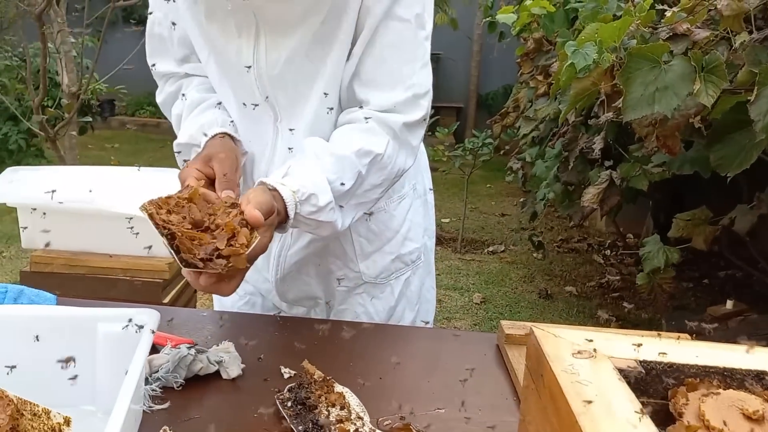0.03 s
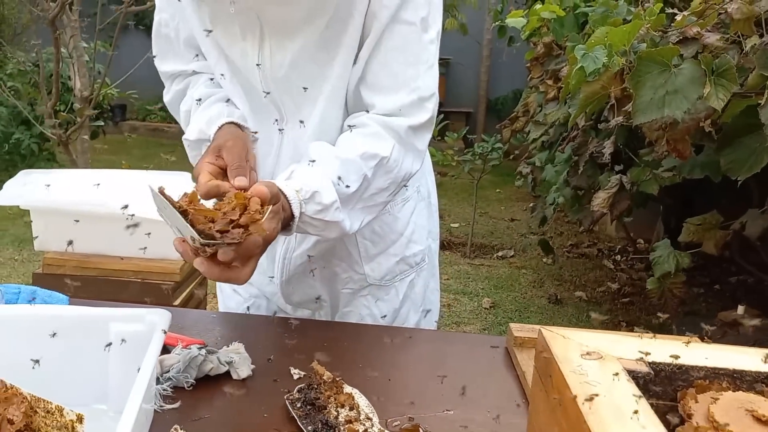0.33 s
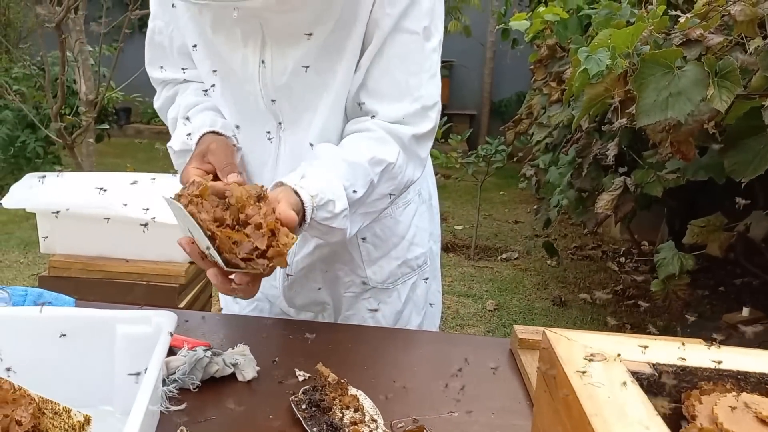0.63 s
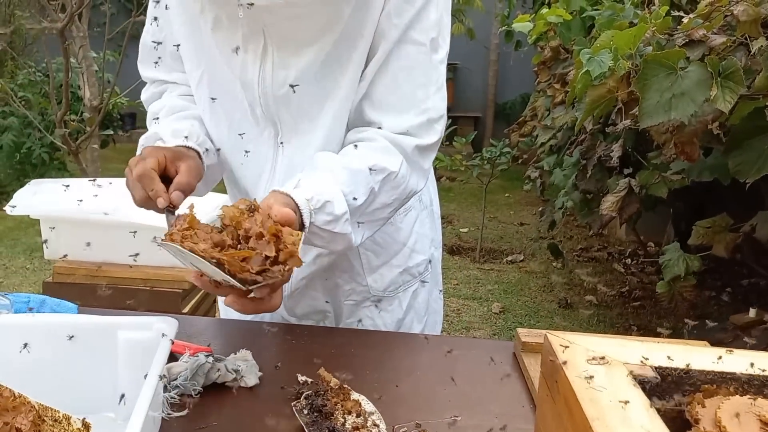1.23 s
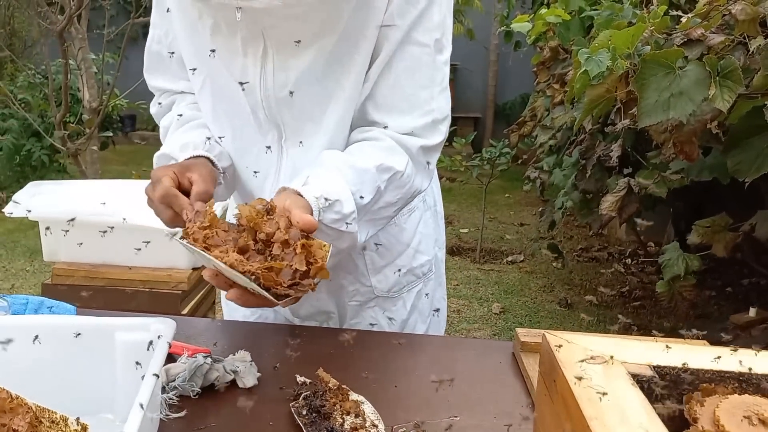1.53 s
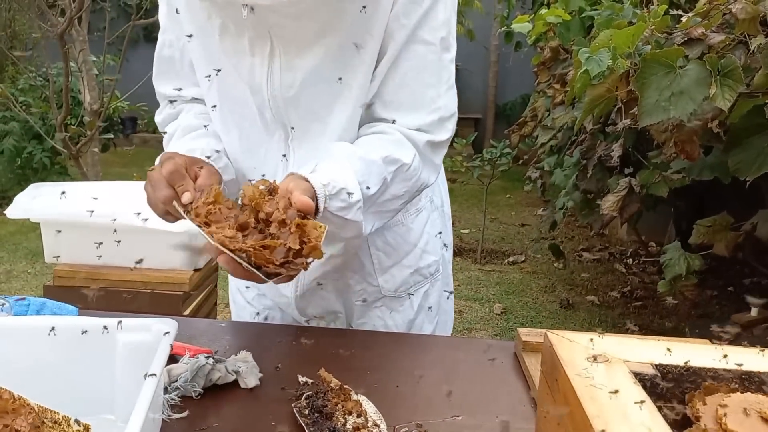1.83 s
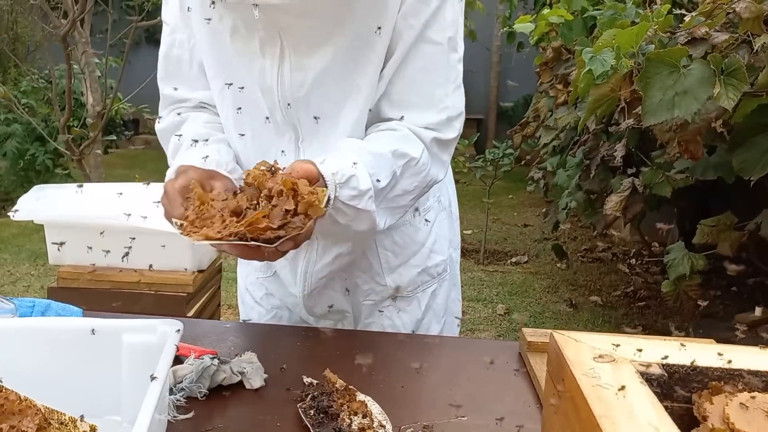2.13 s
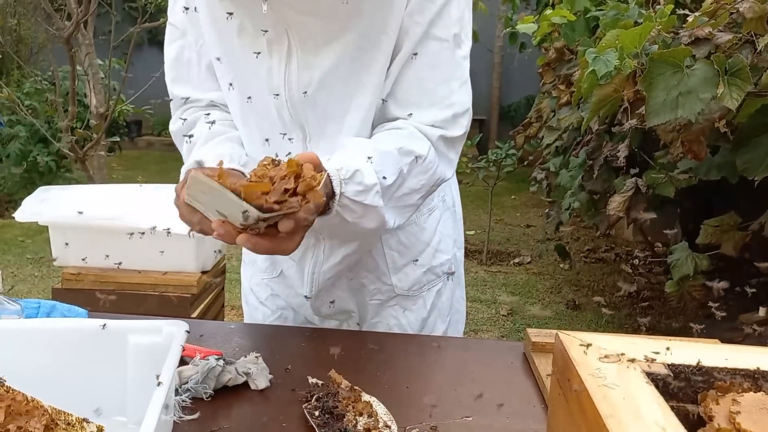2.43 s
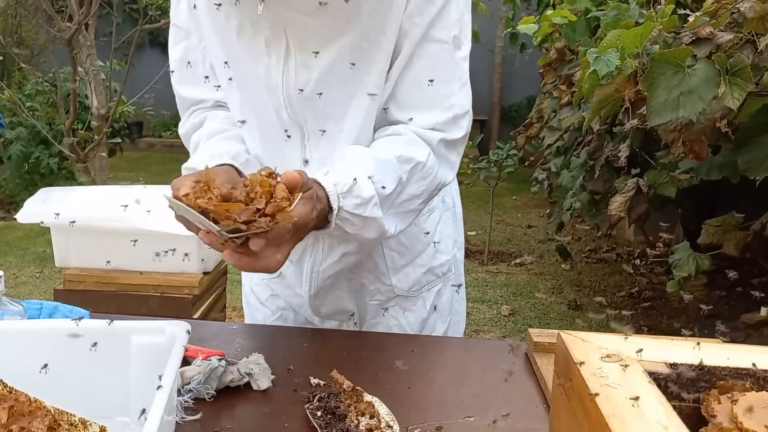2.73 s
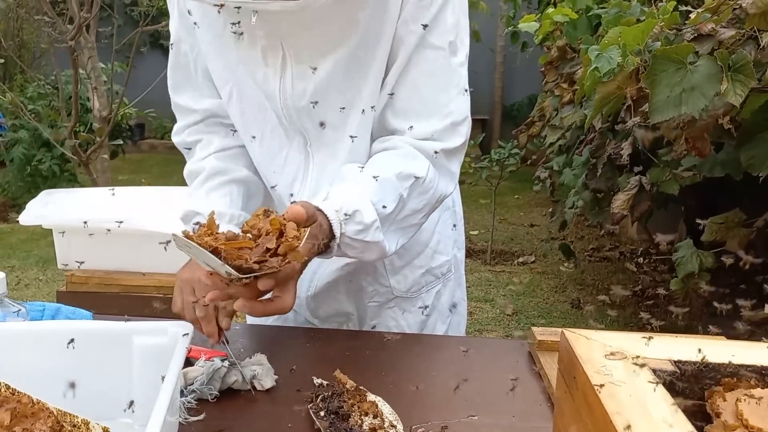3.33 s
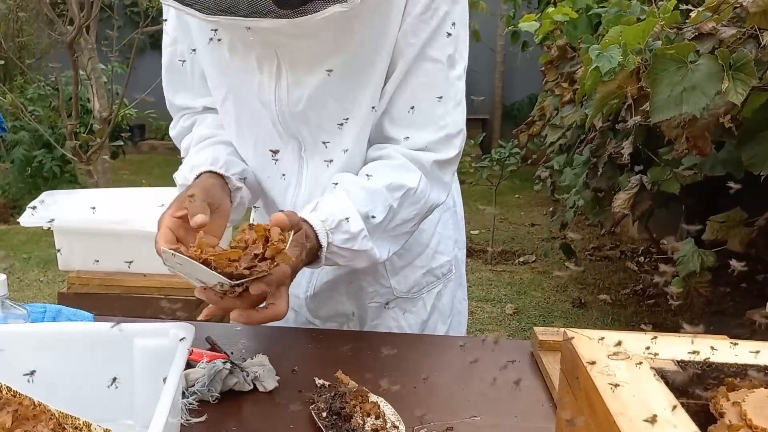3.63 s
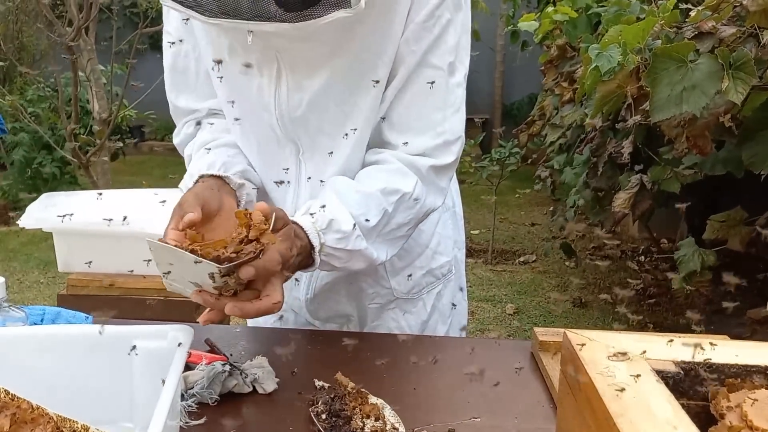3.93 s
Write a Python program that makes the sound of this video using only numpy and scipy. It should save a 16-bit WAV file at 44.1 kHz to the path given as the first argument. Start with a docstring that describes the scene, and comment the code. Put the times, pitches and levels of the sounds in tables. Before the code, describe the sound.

Wax comb crackles, creaks and snaps in irregular bursts between fingers, followed by a short scrape and two table knocks. A dull-sounding outdoor microphone also picks up soft air rumble, faint humming bees and a few far chirps.

```python
"""Brittle honeycomb is broken by hand on a flat scoop, in a garden beside open hives.
Bees hum throughout over a quiet outdoor floor; air sways on a microphone that is dull above 3 kHz.
Far birds twitter first. From 0.16 s wax cells snap, crumble and creak in bursts, loudest near 2.15 s.
Just after 3 s a hand slides along the scoop; near 3.5 s something knocks twice on the work table.
The birds return over the last ticking crumbs."""
import sys
import numpy as np
from scipy import signal
from scipy.fft import rfft, irfft
from scipy.io import wavfile

SR = 44100
rng = np.random.default_rng(int(sys.argv[2]) if len(sys.argv) > 2 else 0)


def inscribe(sig):
    """Save sig as 16-bit PCM at rate SR to the path in sys.argv[1].

    A 1-D sig is mono; a 2-D sig holds one channel per row.
    Samples are clipped to [-1, 1] before scaling.
    """
    pcm = np.round(np.clip(np.atleast_2d(sig).T, -1, 1) * 32767)
    wavfile.write(sys.argv[1], SR, pcm.astype(np.int16))


N = 176400
T = np.arange(N) / SR
LEAD_S = .02   # build-up time ahead of a break
GRAINS_PER_S = 1500


def from_db(db):
    """Decibels to gain."""
    return 10 ** (np.asarray(db) / 20)


def rms_one(x):
    """Scale to rms 1."""
    return x / np.sqrt(np.mean(x ** 2) + 1e-20)


def add(out, start_s, x):
    """Mix x in at start_s."""
    i = max(int(start_s * SR), 0)
    out[i:i + len(x)] += x[:max(N - i, 0)]


def at_hz(points, hz):
    """Read a spectrum on a log-frequency axis."""
    points_hz, points_db = np.transpose(points)
    return np.interp(np.log(hz), np.log(points_hz), points_db)


def colour(x, curve_db):
    """Minimum-phase filter with gain curve_db(hz)."""
    size = 4096
    hz = np.maximum(np.arange(size // 2 + 1) * SR / size, 1)
    cepstrum = irfft(np.log(from_db(curve_db(hz))))
    cepstrum[1:size // 2] *= 2
    cepstrum[size // 2 + 1:] = 0
    return signal.fftconvolve(x, irfft(np.exp(rfft(cepstrum))))[:len(x)]


def bandpass(x, low_hz, high_hz):
    """Butterworth band-pass."""
    return signal.sosfilt(signal.butter(2, [low_hz, high_hz], "band", fs=SR, output="sos"), x)


def resonate(x, hz, width_hz):
    """Two equal resonators in series; rms 1."""
    b, a = signal.iirpeak(hz, hz / width_hz, fs=SR)
    return rms_one(signal.lfilter(b, a, signal.lfilter(b, a, x)))


def drift(per_s, size=N):
    """Smooth random wander, spread about 1."""
    return np.interp(np.arange(size) * per_s / SR, np.arange(2000), rng.standard_normal(2000))


def grains(per_s, size):
    """Random impulses of uneven strength; rms 1."""
    impulses = (rng.random(size) < per_s / SR) * rng.choice([-1, 1], size)
    strength_db = 3 * np.minimum(rng.exponential(1, size), 4)
    return rms_one(impulses * from_db(strength_db))


def air():
    """Steady outdoor floor; slow pressure swings on the microphone."""
    # Floor spectrum. Each row: frequency in Hz, relative gain in dB.
    spectrum = [(20, -5), (40, -5.5), (160, -16.5), (500, -24), (1000, -29), (3000, -35.5), (4500, -32.5),
                (16000, -32)]
    # Pressure swing envelope. Each row: time in seconds, relative level in dB.
    swings = [(0, -30.5), (.22, -30.5), (.6, -47.5), (1.35, -47), (2.2, -39), (2.7, -34), (2.9, -45.5)]
    floor = colour(rng.standard_normal(N + SR), lambda hz: at_hz(spectrum, hz))[SR:]
    sway = bandpass(rng.standard_normal(N + SR), low_hz=4.98, high_hz=11.36)[SR:]
    sway_db = 1.5 + np.interp(T, *np.transpose(swings))
    return from_db(-22.5) * floor + from_db(sway_db) * rms_one(sway)


def bees(level_db=-69, swing_db=4, db_per_octave=-30):
    """Wingbeat tones wander in pitch and swell as bees pass."""
    out = np.zeros(N)
    for wingbeat_hz in 277.6, 290, 304:
        wander = .028 * (drift(per_s=4.6) + .37 * drift(per_s=41.57))
        phase = 2 * np.pi * np.cumsum(wingbeat_hz * (1 + wander)) / SR
        buzz = sum(from_db(db_per_octave * np.log2(k)) * np.sin(k * phase) for k in range(1, 9))
        out += from_db(level_db + swing_db * drift(per_s=2.095)) * rms_one(buzz)
    return out


def birds(sigma_s=.018):
    """Far chirps: soft pulses of a thin noise band, with a second one near 10.7 kHz."""
    # Chirps. Each row: centre in seconds, level in dB.
    chirps = [(.115, -60), (0.211, -64), (.27, -56), (3.63, -57), (3.68, -61), (3.75, -60), (3.91, -61.5)]
    envelope = sum(from_db(db) * np.exp(-.5 * ((T - at_s) / sigma_s) ** 2) for at_s, db in chirps)
    low_band = resonate(rng.standard_normal(N), hz=4420, width_hz=420)
    high_band = resonate(rng.standard_normal(N), hz=10700, width_hz=420)
    return envelope * (low_band + from_db(-1) * high_band)


def wax(x, length_s, bass_db, treble_db, flake_hz=1000, flake_db=0):
    """Fractures ring the comb, its hollow cells and one flake; rms 1 below 3 kHz over length_s."""
    # Comb body response. Each row: frequency in Hz, gain in dB.
    body = [(40, -13), (150, -18), (340, 2.5), (650, 3), (900, -4), (1300, 3.5), (2700, -4), (5000, -8.5),
            (16000, -4)]
    cells_per_octave, flake_octaves = 6.952, .22
    cells_db = 3 * rng.standard_normal(256)   # each burst has its own cells

    def curve_db(hz):
        tilt_db = np.interp(hz, [450, 900, 3000, 5000], [bass_db, 0, 0, treble_db])
        hollow_db = np.interp(cells_per_octave * np.log2(1 + hz / 400), np.arange(256), cells_db)
        ring_db = flake_db / (1 + (np.log2(hz / flake_hz) / flake_octaves) ** 2)
        return at_hz(body, hz) + tilt_db + hollow_db + ring_db

    rung = colour(x, curve_db)
    lows = signal.sosfilt(signal.butter(4, 3000, fs=SR, output="sos"), rung)
    return rung / np.sqrt(np.sum(lows ** 2) / (length_s * SR) + 1e-20)


def crack(build_ms, decay_ms, bass_db, treble_db, flake_hz=1000, flake_db=0):
    """Fractures build to one sharp break at LEAD_S and die away."""
    crackle_db, crackle_ms = -20, 6.2   # faint crackle softens each snap's start and end
    ms = np.arange(-int(LEAD_S * SR), int(.08 * SR)) * 1000 / SR
    burst = np.exp(-abs(ms) / np.where(ms < 0, build_ms, decay_ms))
    crackle = from_db(crackle_db) * np.exp(-abs(ms) / crackle_ms)
    impulses = grains(SR / 2, len(ms)) * (burst + crackle)
    impulses[ms == 0] = 9.9   # the break
    return wax(impulses, .005, bass_db, treble_db, flake_hz, flake_db)


def snaps():
    """Cell walls break; loose crumbs tick."""
    # Wall breaks. Each row: time in seconds, level in dB, build-up in ms, decay in ms,
    # flake pitch in Hz, flake ring in dB, treble in dB.
    breaks = [(0.1627, -29.5, 0.21, 2.2, 562, 11, 10), (.1650, -30, 0.61, 3.3, 1186, 22, -11),
              (0.179, -30.5, 12, 6.8, 2310, 12.5, 3.5), (.3650, -24.5, 0.099, 3.5, 2260, 10.5, -2.5),
              (0.377, -28.5, 0.18, 1.05, 2150, 6.5, -3), (0.7482, -32, 0.91, 0.56, 613, 8, -13),
              (1.1484, -32.5, 0.058, 2.1, 960, 4.5, -7), (1.6484, -37, 3.1, 2.7, 1250, 5, 1),
              (1.78, -36, 0.49, 6, 594, 11, -17), (1.8068, -25.5, 0.12, 3.6, 1030, 3, 0.5),
              (2.1231, -18, 2.1, 1.6, 433, 5, -1.5), (2.1677, -17, 2.2, 2.9, 2940, 11, -5),
              (2.1666, -22, 1.7, 0.73, 406, 14, 2), (2.1785, -28, 0.93, 3.5, 2620, 14, 8),
              (2.1808, -23, 1.3, 2.2, 367, 10, 5), (2.1932, -25, 0.93, 1.8, 550, 1, 0),
              (2.2488, -32.5, 4.1, 6.3, 507, 1, -4), (2.5467, -29, .1, 2.9, 1370, 13.5, 5),
              (2.5742, -23, 2.6, 2.7, 1110, 10, -2.5)]
    # Crumb ticks. Each row: time in seconds, level in dB, treble in dB.
    ticks = [(0.3573, -38, 0), (0.401, -39, -7), (0.411, -41, 8), (0.495, -48.5, 4), (.548, -56.5, 18),
             (.605, -48.5, 12), (.978, -48, -17), (1.201, -53, -17), (1.89, -44, -7), (2.36, -45, -22),
             (2.569, -31, -9), (2.8396, -44.5, -3), (2.939, -53.5, -10), (3.108, -44, -3),
             (3.414, -40.5, -4.5), (3.5224, -39.5, -2.5), (3.888, -47.5, -24), (3.826, -44, -9)]
    out = np.zeros(N)
    for at_s, db, build_ms, decay_ms, flake_hz, flake_db, treble_db in breaks:
        bass_db = 5 * np.log2(1000 / flake_hz)   # larger, lower flakes carry more bass
        snap = crack(build_ms, decay_ms, bass_db, treble_db, flake_hz, flake_db)
        add(out, at_s - LEAD_S, from_db(db) * snap)
    for at_s, db, treble_db in ticks:
        tick = crack(build_ms=1.3, decay_ms=2.6, bass_db=0, treble_db=treble_db)
        add(out, at_s - LEAD_S, from_db(db) * tick)
    return out


def crumbles(attack_s=.0028, release_s=.013, lump_db=2, stray_db=-69):
    """Each squeeze frees one shower of tiny fractures per flake size; stray crumbs shift throughout."""
    # Finger squeezes. Each row: start in seconds, length in seconds, level in dB, bass in dB,
    # treble in dB.
    squeezes = [(0.394, 0.048, -44.5, 6.5, -8), (0.689, 0.045, -40.5, 0, -1.5),
                (0.754, 0.043, -50.5, 8, -2), (1.4251, 0.024, -32.5, -2.5, -0.5),
                (1.526, 0.023, -37.5, 4.5, -3.5), (1.551, 0.031, -43, 1.5, -2.5),
                (1.757, 0.076, -45, 7.5, -0.5), (1.868, 0.085, -48.5, 10, 0.5),
                (2.173, 0.025, -34, -8, -13), (2.244, 0.053, -39, 7, -2), (2.394, 0.031, -47, 7, 2),
                (2.449, 0.024, -50.5, 9, -6), (2.51, 0.051, -45, -1.5, -6), (2.551, 0.012, -38.5, -28, 2),
                (2.702, 0.042, -46.5, 10, -6), (2.984, 0.044, -41.5, -0.5, -3),
                (3.023, 0.025, -42.5, -1, -3.5), (3.135, 0.041, -44, 1.5, 0.5),
                (3.44, 0.031, -41.5, 12, -39), (3.559, 0.039, -42.5, 12, -6)]
    # Flake pitches in Hz.
    flakes_hz = [710, 1250, 2150, 2650]
    strays = grains(per_s=72, size=N)
    out = from_db(stray_db) * wax(strays, N / SR, bass_db=17, treble_db=12.5)
    t = T[:SR // 5]
    for start_s, length_s, db, bass_db, treble_db in squeezes:
        push = np.clip(t / attack_s, 0, 1) * np.clip((length_s - t) / release_s + .5, 0, 1)
        push *= from_db(lump_db * drift(per_s=151, size=len(t)))
        for hz in flakes_hz:
            shower = grains(GRAINS_PER_S / len(flakes_hz), len(t)) * push
            crumbs = wax(shower, length_s / len(flakes_hz), bass_db, treble_db, hz, flake_db=8.5)
            add(out, start_s, from_db(db) * crumbs)
    return out


def creaks(slips_per_s=170, attack_s=.0025, t60_s=.012):
    """Wax sticks and slips; uneven slips ring one flake, fading and sagging in pitch."""
    # Runs of slips. Each row: start in seconds, length in seconds, pitch in Hz, level in dB.
    runs = [(0.63, 0.028, 2465, -37.5), (.714, 0.024, 2420, -37), (.736, 0.024, 2300, -39),
            (1.433, 0.016, 1440, -38.5), (1.427, 0.033, 690, -39)]
    spread_db, detune_octaves, sag_octaves = .5, .04, .054
    out, t = np.zeros(N), T[:SR // 10]
    for start_s, length_s, hz, db in runs:
        slips_s = (np.arange(16) + rng.uniform(0, .5, 16)) / slips_per_s
        creak = np.zeros(len(t))
        for slip_s, (force, detune) in zip(slips_s, rng.standard_normal((16, 2))):
            age_s = np.maximum(t - slip_s, 0)
            progress = slip_s / length_s
            pitch_hz = hz * 2 ** (detune_octaves * detune - sag_octaves * progress)
            envelope = np.minimum(age_s / attack_s, 1) * from_db(spread_db * force - 60 * age_s / t60_s)
            creak += max(1 - progress, 0) * envelope * np.sin(2 * np.pi * pitch_hz * age_s)
        add(out, start_s, from_db(db) * rms_one(creak) * np.sqrt(length_s * SR / len(t)))
    return out


def slide():
    """A hand rubs the scoop; friction grains hiss in a few resonances."""
    # Stroke envelope. Each row: time in seconds, level in dB.
    stroke = [(3.051, -71), (3.079, -44.5), (3.125, -43.5), (3.15, -39.5), (3.2, -71)]
    # Resonances. Each row: centre in Hz, width in Hz, relative level in dB.
    rings = [(2430, 3400, 5), (6600, 710, 4), (9300, 1000, -0.5)]
    friction = grains(GRAINS_PER_S, N)
    hiss = rms_one(sum(from_db(db) * resonate(friction, hz, width_hz) for hz, width_hz, db in rings))
    times_s, levels_db = np.transpose(stroke)
    touching = (T > times_s[0]) & (T < times_s[-1])
    return hiss * from_db(np.interp(T, times_s, levels_db)) * touching


def knocks(chatter_ms=5.2, rattle_db=-36, rattle_t60_s=.23):
    """A hard contact rings the table, chatters briefly and shakes loose things on it."""
    # Contacts. Each row: start in seconds, ring in dB, clatter in dB.
    contacts = [(3.4726, -19.5, -12), (3.479, -33, -26), (3.544, -28, -21)]
    # Table modes. Each row: frequency in Hz, relative level in dB, T60 in seconds.
    modes = [(200, -14.5, 0.21), (256, -9.5, 0.29), (330, -17, 0.13), (435, 1, 0.12), (645, -3.5, 0.11),
             (853, -5.5, 0.08), (1010, -4, 0.064), (1405, -7, 0.082), (1720, 4.5, 0.031)]
    # Clatter spectrum. Each row: frequency in Hz, relative gain in dB.
    spectrum = [(100, -13), (550, 1), (1000, -7.5), (2700, -8), (6000, -34)]
    out, t = np.zeros(N), T[:SR // 2]
    for start_s, ring_db, clatter_db in contacts:
        for k, (hz, db, t60_s) in enumerate(modes):
            envelope = from_db(ring_db + db + rng.normal(0, 1) - 60 * t / t60_s)
            add(out, start_s, (-1) ** k * envelope * np.sin(2 * np.pi * hz * t))
        chatter = grains(SR / 2, len(t)) * np.exp(-1000 * t / chatter_ms)
        chatter[0] = 3.9   # first contact
        clatter = rms_one(colour(chatter, lambda hz: at_hz(spectrum, hz)))
        clatter *= np.sqrt(.005 * SR / len(t))   # energy of 5 ms at rms 1
        add(out, start_s, from_db(clatter_db) * clatter)
        rattle = rms_one(bandpass(grains(GRAINS_PER_S, len(t)), low_hz=270, high_hz=900))
        add(out, start_s, from_db(rattle_db - 60 * t / rattle_t60_s) * rattle)
    return out


def garden(x, near_t60_s=.047, far_t60_s=1.9):
    """Quick scatter from table and hives, then a faint tail from fence and hedge."""
    # Echo colour. Each row: frequency in Hz, relative gain in dB.
    spectrum = [(60, 18.5), (250, -6.5), (600, -10.5), (5000, -6.5), (16000, -3)]
    echo, t = np.zeros(SR), T[:SR]
    for t60_s in near_t60_s, far_t60_s:
        tail = rng.standard_normal(SR) * from_db(-60 * t / t60_s) * (t > .004)
        echo += from_db(-17.5) * rms_one(tail) / np.sqrt(SR)
    return colour(signal.fftconvolve(x, echo)[:N], lambda hz: at_hz(spectrum, hz))


def scene():
    """Handling sounds and their echoes over bees, birds and air."""
    handling = snaps() + crumbles() + creaks() + slide() + knocks()
    return (handling + garden(handling) + bees() + birds() + air())[None]


def record(dry):
    """The microphone shelves the treble down; the top is cut."""
    # Microphone response. Each row: frequency in Hz, gain in dB.
    response = [(20, 0), (2700, -6), (3200, -9.5), (3600, -15), (4100, -23.5), (10500, -25.5), (13000, -29),
                (16000, -47)]
    stopband_hz = 16640
    heard = colour(dry[0], lambda hz: at_hz(response, hz))
    return signal.sosfilt(signal.cheby2(12, 60, stopband_hz, fs=SR, output="sos"), heard)[None]


dry = scene()
out = record(dry)
inscribe(out)
```